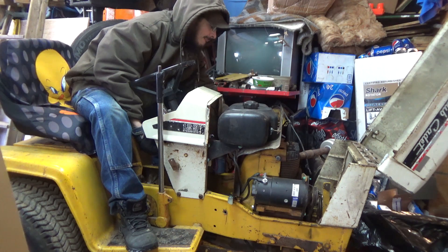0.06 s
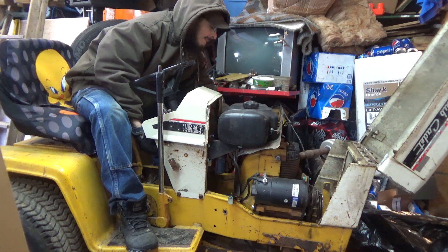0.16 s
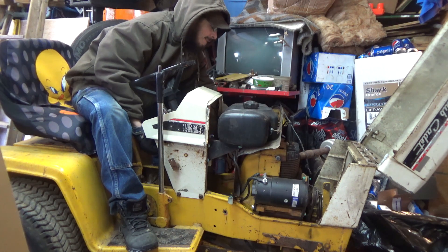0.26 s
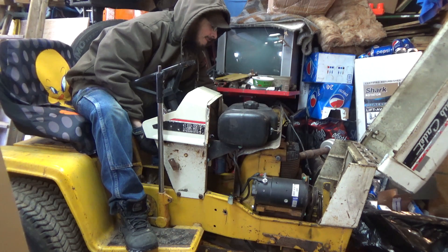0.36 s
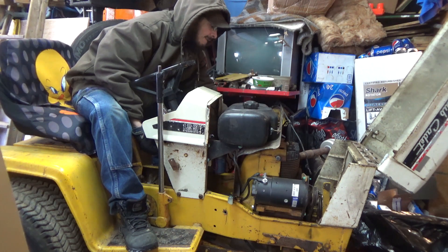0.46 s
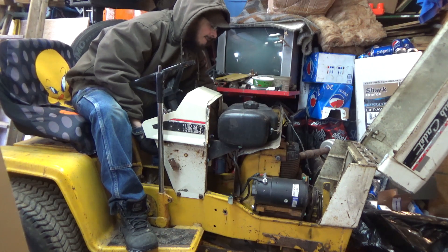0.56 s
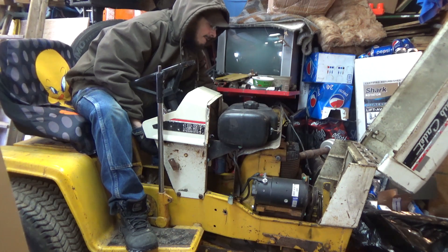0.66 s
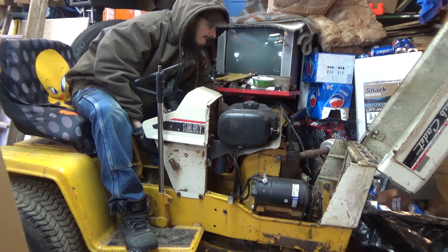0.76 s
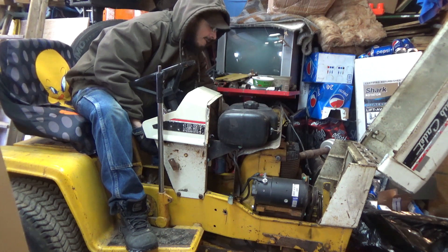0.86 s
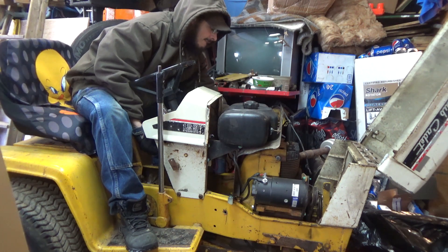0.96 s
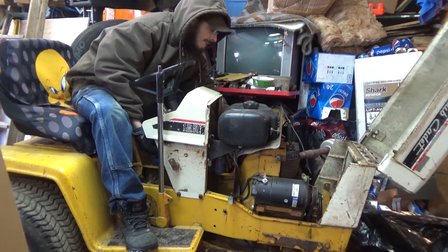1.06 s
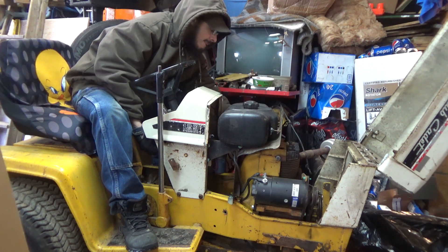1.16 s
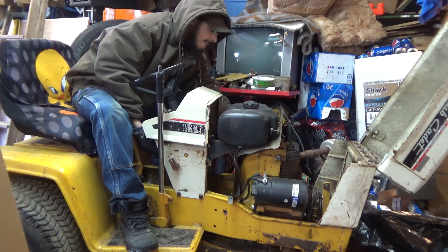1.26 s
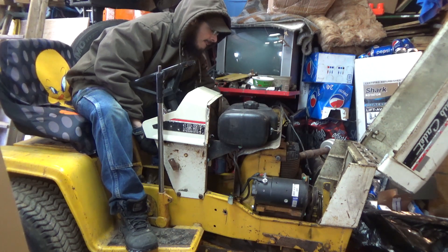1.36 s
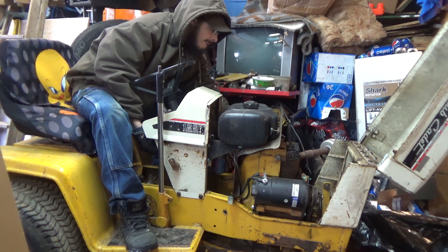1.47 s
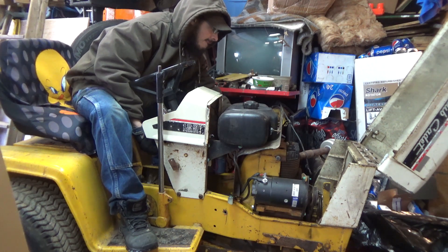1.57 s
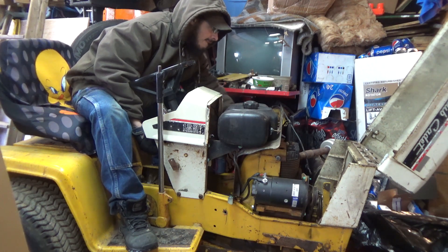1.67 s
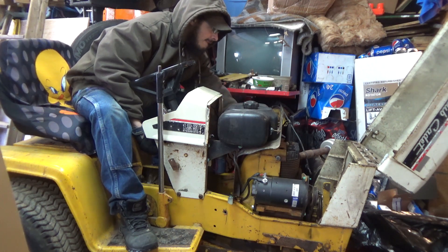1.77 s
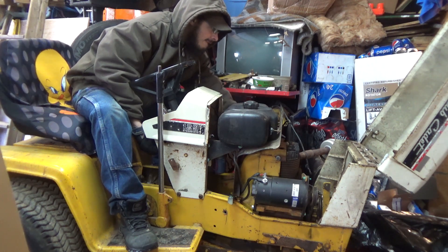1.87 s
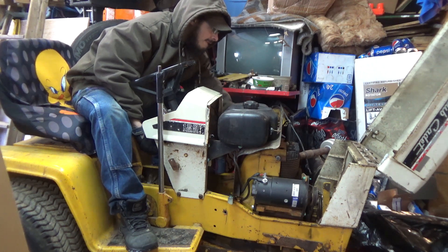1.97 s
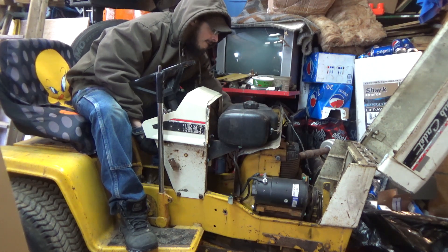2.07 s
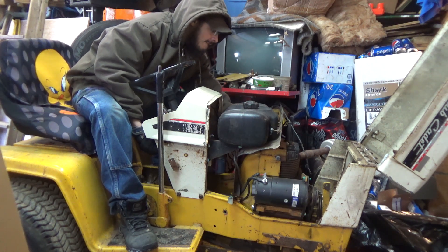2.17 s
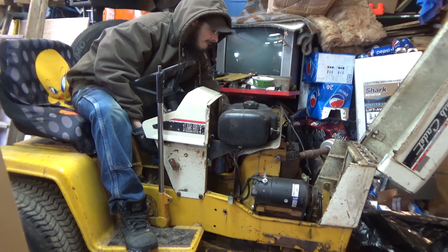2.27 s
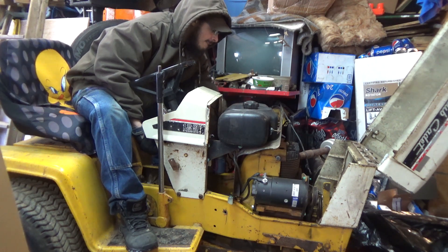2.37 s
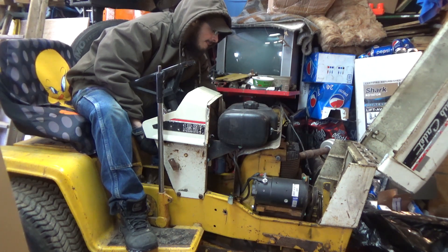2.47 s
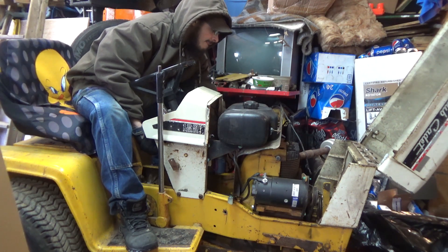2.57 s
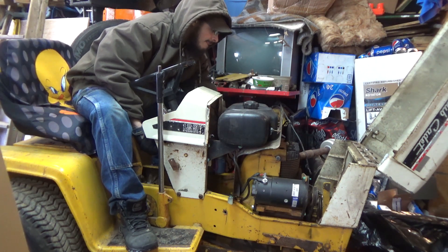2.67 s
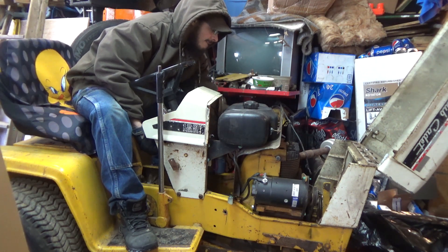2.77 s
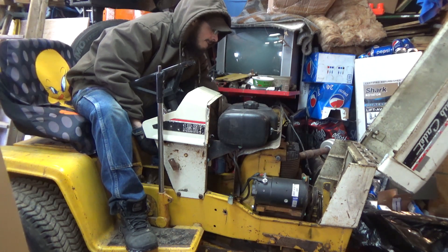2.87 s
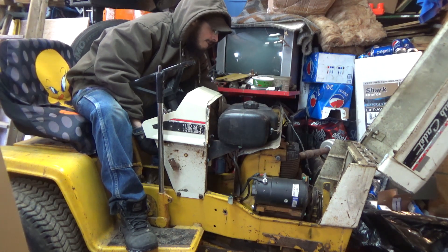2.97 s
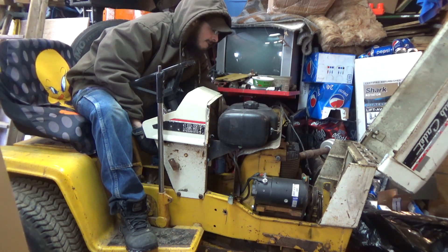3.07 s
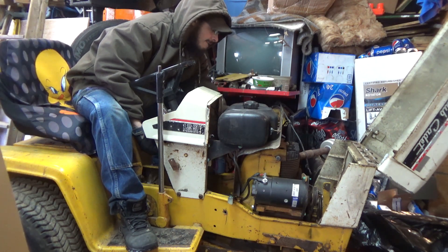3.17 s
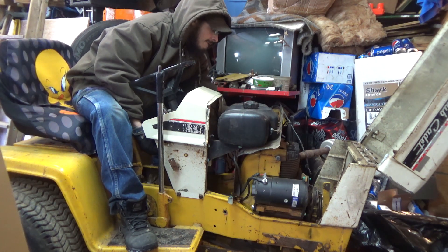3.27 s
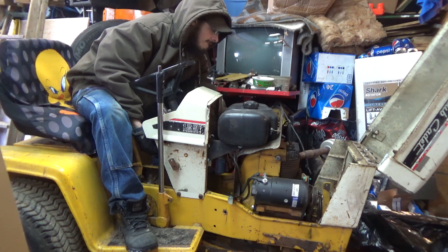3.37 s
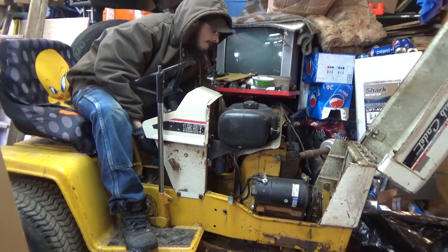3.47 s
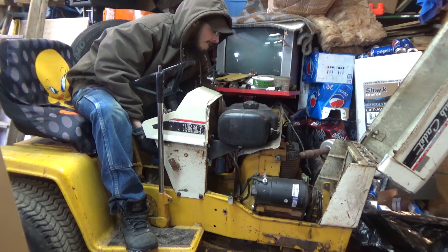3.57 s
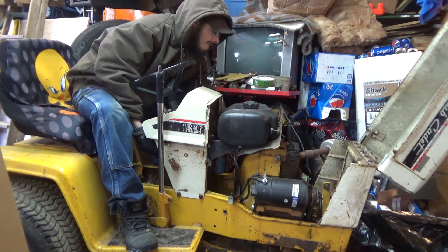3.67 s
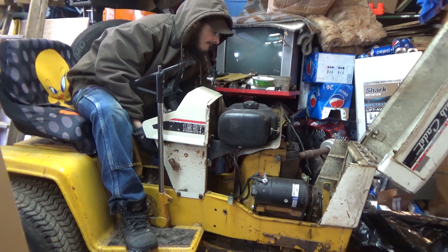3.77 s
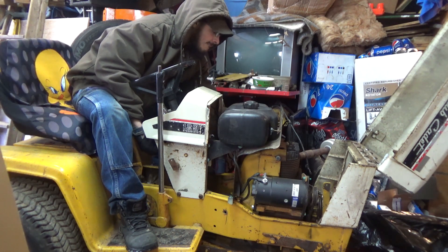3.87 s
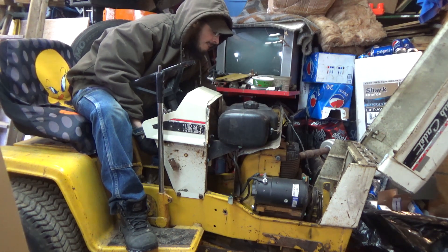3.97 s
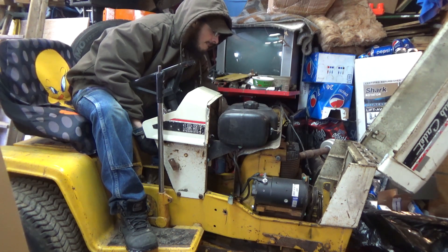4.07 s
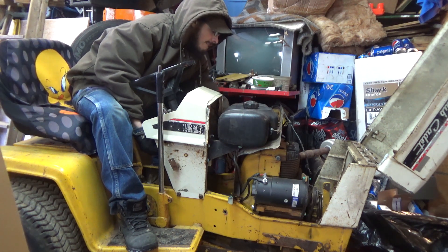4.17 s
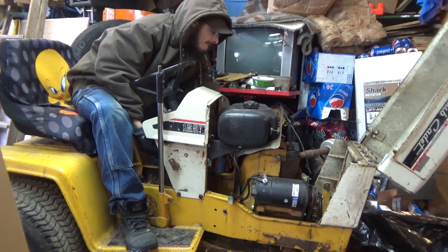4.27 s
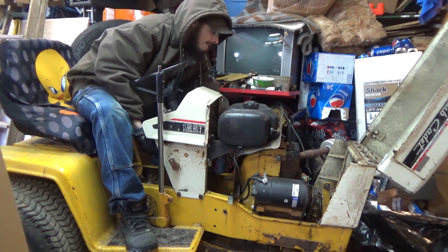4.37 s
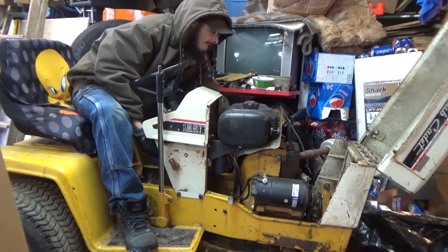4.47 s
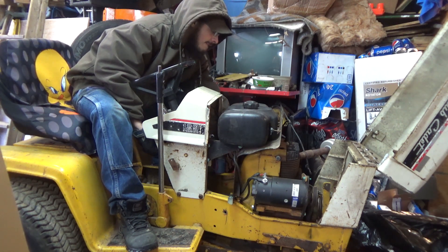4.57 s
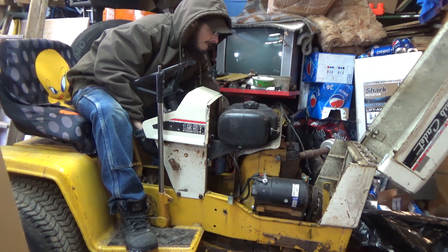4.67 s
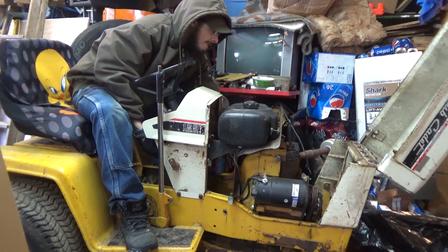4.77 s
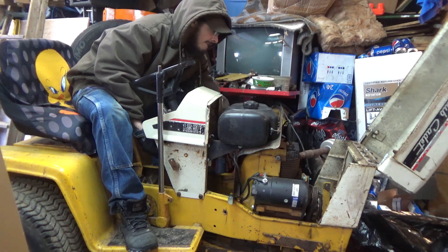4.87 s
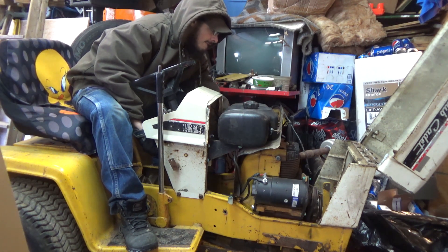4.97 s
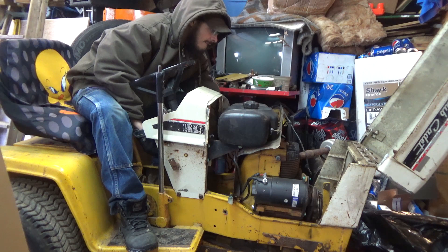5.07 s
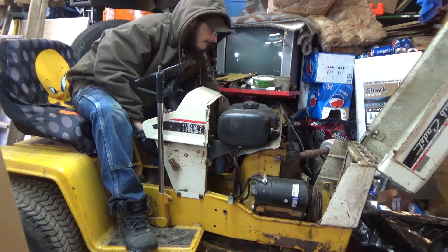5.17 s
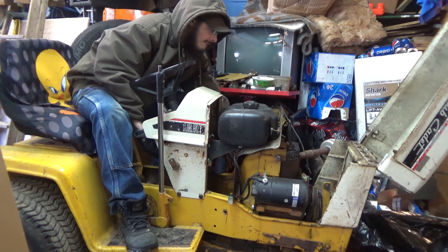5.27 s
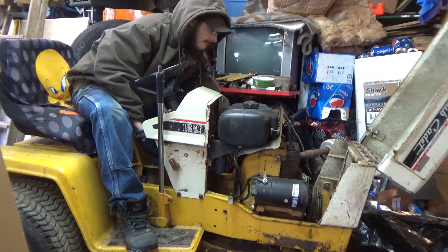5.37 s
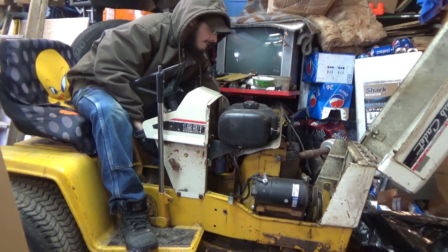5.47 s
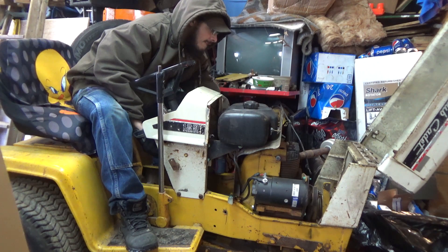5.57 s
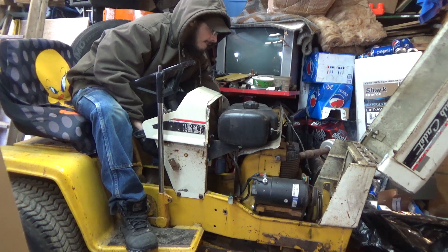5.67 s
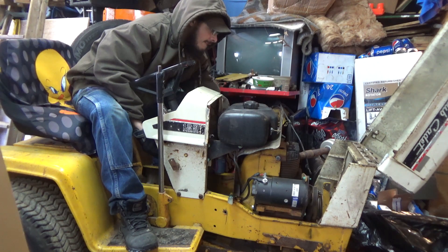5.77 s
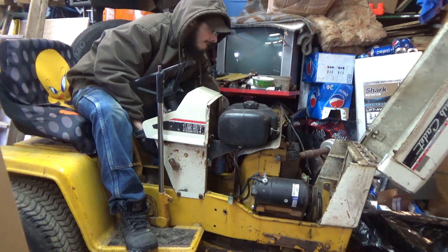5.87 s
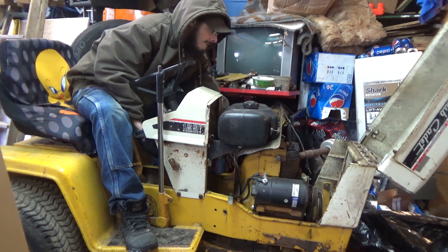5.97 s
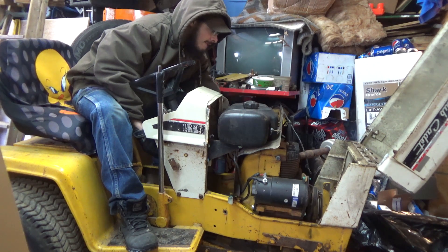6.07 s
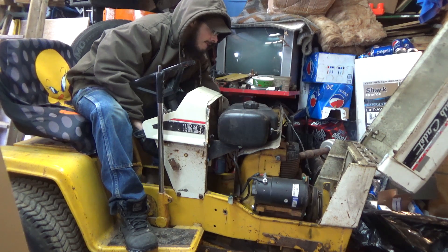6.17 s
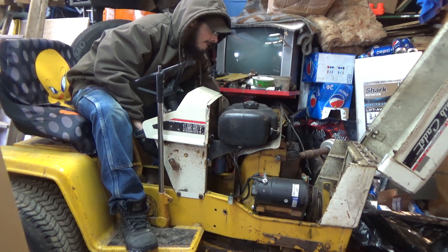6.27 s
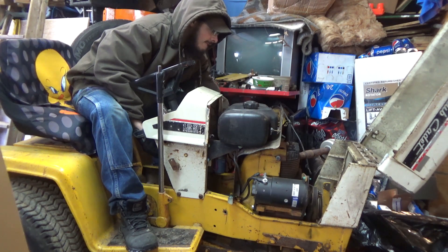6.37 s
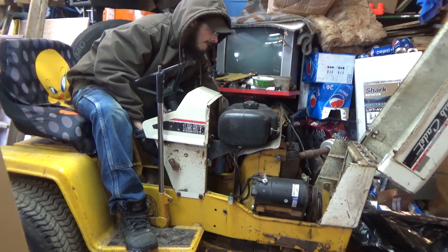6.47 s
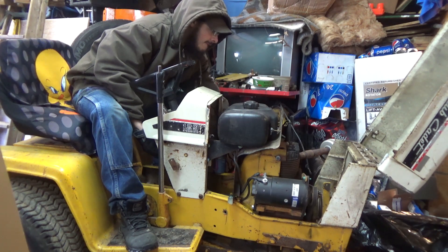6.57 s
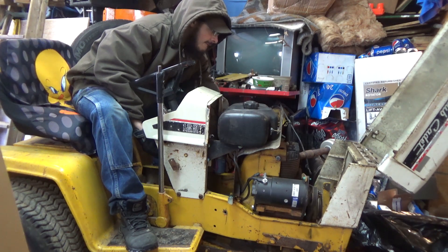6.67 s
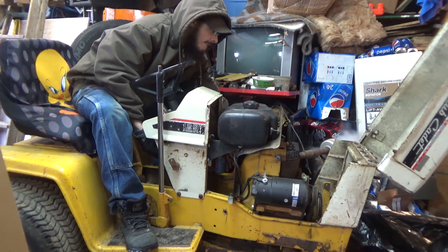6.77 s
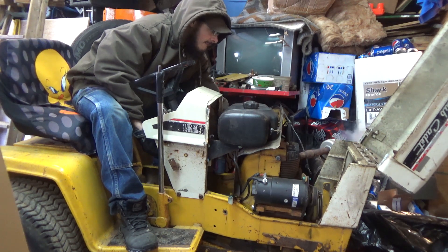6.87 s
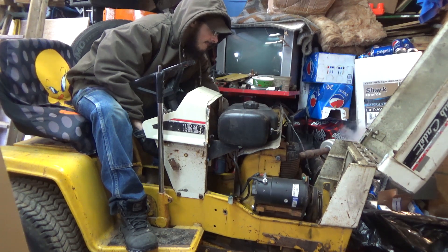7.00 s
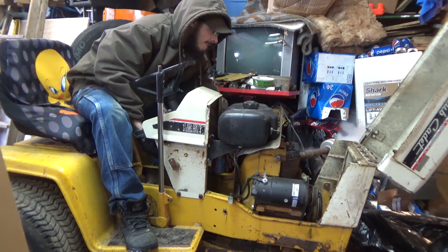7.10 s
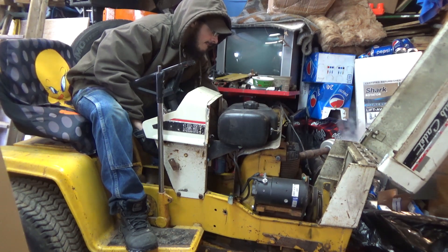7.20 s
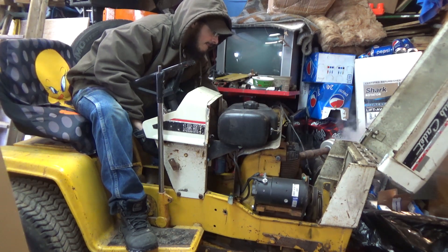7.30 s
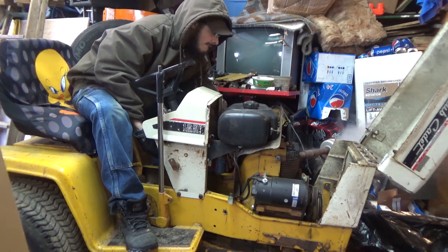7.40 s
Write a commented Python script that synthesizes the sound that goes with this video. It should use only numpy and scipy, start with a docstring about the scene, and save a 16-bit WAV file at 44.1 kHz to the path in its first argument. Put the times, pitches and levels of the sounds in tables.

```python
"""Levers knock and cloth rubs on the seat of a small tractor, close to the microphones in a quiet workshop.
The starter clunks in once and drops out, then grinds the single cylinder over without the engine catching.
Uneven clicks, coloured and swelling in patches, make gear chatter, rumble, hiss and cloth; ringing bursts make
clanks and knocks; decaying tones make the frame's thumps and rising tones the exhaust's puffs.
Faint room air, hum and even ticking lie behind, and short wall echoes surround the close sound."""
import sys
import numpy as np
from scipy import signal
from scipy.fft import rfft, irfft, next_fast_len
from scipy.io import wavfile
from scipy.ndimage import uniform_filter1d

SR = 44100
rng = np.random.default_rng(int(sys.argv[2]) if len(sys.argv) > 2 else 0)


def wav_record(signal):
    """Record a signal, one row per channel, as 16-bit PCM in the file named by sys.argv[1]."""
    frames = np.transpose(np.atleast_2d(signal))
    bounded = np.clip(frames, -1, 1)
    # unit amplitude maps onto the largest positive 16-bit level
    quanta = np.round(bounded * 32767).astype(np.int16)
    wavfile.write(sys.argv[1], SR, quanta)


N = 328104  # samples

# Every level_db is a relative setting: mixing, filters and the final squeeze act on it later.
# Starter turning until the crank spins, one table a burst: start_s, hiss_db, chatter_db, rumble_db
STARTER_BURSTS = [
    [(4.56, -29, -28, -40.5), (4.6, -40, -43, -47), (4.665, -42.5, -40.5, -42.5), (4.72, -48, -45, -40)],
    [(5.12, -52, -59, -53), (5.2, -33, -28, -31), (5.28, -39, -29, -34.5), (5.34, -47, -57, -38.5),
     (5.42, -42, -32, -35.5), (5.51, -46, -44, -38.5), (5.58, -34, -33, -32.5), (5.68, -43, -37.5, -35),
     (5.76, -33, -40, -34.5), (5.815, -41, -41.5, -31)],
]
# Turns of the spinning crank: start_s, hiss_db, chatter_db, rumble_db, swing_depth (factor 0-2)
CRANK_TURNS = [(5.835, -27.5, -25, -27.5, 0.94), (6.107, -26, -23.5, -26, 0.91),
               (6.334, -24.5, -22.5, -25.5, 0.75), (6.538, -23.5, -24, -27.5, 1),
               (6.763, -23.5, -25, -25.5, 1.23), (7.099, -23.5, -24, -26, 1.32),
               (7.403, -27, -21.5, -28, 1.2)]
LAST_TURN_S = 0.19
# Swing within each turn, loud as the load lets go: turn_share (0-1), hiss_db, chatter_db, rumble_db
TURN_SWING = [(.12, 2.6, -0.3, -3.5), (.38, -6.5, -3.5, -2), (.56, -11, -3.5, -0.5), (.68, -6, -9, -2.5),
              (.84, -4, -10, -3.5), (.94, -12, -10, -3.5)]
# Clanks repeated in each of the first turns: turn_share, level_db, brightness_db_per_octave, part
TURN_CLANKS = [(-.028, -4, 0.5, "bright"), (.215, -5.5, -0.4, "chink"), (.36, -7.5, -2.5, "clack"),
               (.62, -9, 1.5, "tock")]
EVEN_TURNS = 3
# Uneven clanks of the engine parts: start_s, level_db, brightness_db_per_octave, part
ENGINE_CLANKS = [(4.522, -4.5, 2.6, "bright"), (4.679, -10.5, -1, "clang"), (4.779, -40, -8, "clang"),
                 (4.915, -35.5, 2.5, "body"), (4.975, -27.5, -4.2, "body"), (5.097, -36, 6, "tock"),
                 (5.137, -14, -1.5, "clack"), (5.16, -7, 1.1, "clack"), (5.218, -4.5, -1.5, "chink"),
                 (5.259, -13.5, -3.5, "clang"), (5.34, -22.5, 7, "tock"), (5.393, -14.5, -1, "bright"),
                 (5.437, -15.5, 0.5, "tock"), (5.529, -16, -1.5, "thud"), (5.608, -12.5, -3.5, "low"),
                 (5.701, -16.5, 1.5, "low"), (5.859, -9.5, 0, "clack"), (6.532, -4.5, .6, "bright"),
                 (6.587, -4.5, -.3, "chink"), (6.62, -7.5, -1.5, "clack"), (6.716, -8.5, .8, "bright"),
                 (6.763, -8.5, 1.7, "clack"), (6.772, -7, 5.5, "chink"), (6.799, -6.5, 10, "bright"),
                 (6.91, -14, -4, "thud"), (6.955, -12, .8, "thud"), (6.998, -8.5, -2.4, "tock"),
                 (7.099, -5, 1.1, "chink"), (7.139, -6, 4, "clack"), (7.256, -14.5, -4, "thud"),
                 (7.283, -11, -2, "low"), (7.319, -11, -2.5, "tock"), (7.403, -4.5, 0.5, "chink")]
# What each part rings with: rise_s, metal_db, then pairs of ring_hz, ring_db
PART_RINGS = {"bright": (.0055, -15, 1180, -10, 5007, -5.5, 6400, -9),
              "chink": (.0012, -14, 1437, -8.5, 3424, -4.5, 2500, -8),
              "clang": (.0025, -10.5, 450, -9, 1460, -8, 2513, -6),
              "clack": (.003, -15, 1110, -8, 2477, -7), "tock": (.004, -14, 870, -8, 1945, -9.5),
              "thud": (.004, -13, 890, -5, 2472, -7), "low": (.0025, -13, 561, -6, 3050, -4),
              "body": (.004, -10, 440, -4, 1500, -7)}
# Ringing of engine and panels: pitch_hz, level_db, t60_s
METAL_MODES = [(418, -14, .3), (454.5, -14, .3), (497.3, -11.5, 0.35), (873, -19, 0.2), (1008, -17, 0.57),
               (1270, -12.5, 0.35), (1477.5, -8.5, 0.19), (1683, -23, 1.5), (2146, -25.5, 1.5),
               (2498, -8, 0.13), (2510, -14, 0.26), (2920, -27, 0.24), (3060, -9, 0.21),
               (3395, -6.5, 0.082), (3780, -13, 0.17), (4800, -13, .15), (5180, -12.5, 0.089),
               (7750, -15, 0.1)]
# Spectrum of gear chatter: pitch_hz, level_db per Hz
GEAR_SPECTRUM = [(710, -29), (1200, -0.5), (1300, -10.5), (1870, -3), (3280, -5.5), (4200, -19),
                 (5460, -39), (9240, -120)]
# Spectrum of frame rumble: pitch_hz, level_db per Hz
RUMBLE_SPECTRUM = [(18, -64), (30, -41), (197, -12), (486, -6.5), (527, .6), (778, -7.5), (897, 2.5),
                   (1100, -10.5), (2500, -11), (4000, -17.5), (5200, -50), (8800, -120)]
# Spectrum of the starter's air hiss: pitch_hz, level_db per Hz
HISS_SPECTRUM = [(2350, -37), (4000, -5), (5040, 1), (6470, -5.5), (7270, -0.5), (11600, -6), (16000, -30)]
# Spectrum of the rattle in each clank: pitch_hz, level_db per Hz
CLANK_SPECTRUM = [(88, -46), (150, -19), (205, -11.5), (254, -19), (457, -8.5), (774, -5), (1790, -2.5),
                  (2140, -5), (3420, -3), (4240, -6.5), (8400, -5.5), (16000, -26)]
# The frame rocks on its mounts: start_s, level_db, pitch_hz
FRAME_THUMPS = [(5.339, -59, 277), (5.383, -49, 278), (5.445, -35, 235), (5.824, -31, 230),
                (5.874, -25.5, 210), (6.101, -28, 220), (6.139, -25.5, 215), (6.234, -29.5, 191),
                (6.355, -24, 206), (6.557, -20, 214), (6.678, -26.5, 261), (7.008, -29.5, 205),
                (7.206, -29.5, 248), (7.317, -27.5, 213)]
# The exhaust valve lets puffs down the pipe: start_s, level_db, length_s
EXHAUST_PUFFS = [(5.554, -47, .11), (5.93, -49.5, 0.07), (6.17, -43, 0.088), (6.39, -41.5, 0.084),
                 (6.593, -39, 0.063), (6.803, -52, 0.075), (6.917, -50.5, 0.084), (7.122, -49, .08),
                 (7.25, -50.5, 0.085)]
# Levers, pedals and seat: start_s, level_db, brightness_db_per_octave, ring_hz, ring_db, rise_s
LEVER_KNOCKS = [(.115, -42, -2.5, 1010, -6, .02), (.22, -28, -.8, 850, 0, .002),
                (.299, -40, -2, 732, -2, .006), (0.344, -20, -4, 800, -1.5, .002),
                (.555, -34.5, -4, 1800, 3, .015), (.826, -42.5, -2, 417, -6, .004),
                (.892, -41, 4, 5000, -3, .0004), (.935, -39, -4, 900, -2, .01),
                (.965, -39, -4, 1750, 5.5, .008), (1.125, -46, 2.5, 3630, 2.5, .0004),
                (1.166, -39, -1.5, 2800, -4, .002), (1.363, -42, -3, 719, -15, .003),
                (1.612, -34, -1, 1260, -3, .008), (1.64, -26.5, -5, 2040, -5, .01),
                (1.689, -31, -1.5, 6300, -4, .006), (1.766, -21, -3.5, 1420, -1.5, .002),
                (1.86, -40, 0, 3400, -5, .006), (1.95, -43, -4, 1720, 3, .02),
                (2.126, -43, 1, 3460, -3, .001), (2.17, -37, .7, 2050, -5, .012),
                (2.3, -42, -2, 1800, -5, .04), (2.77, -48, 1, 7000, -5, .01),
                (2.546, -24, 1, 4470, -8, .003), (3.219, -41.5, -3.5, 988, 0, .002),
                (3.27, -37.5, 1.5, 993, -7, .006), (3.41, -37, 1.2, 945, -5, .008),
                (3.478, -36, .6, 563, -12, .008), (3.676, -26, -.6, 5500, .8, .001),
                (3.856, -42, -4.5, 960, 9, .002), (3.925, -46, 1.5, 2300, -2, .02),
                (4.02, -50, -4, 2310, 1, .02), (4.127, -25, .6, 3100, -3, .006),
                (4.471, -35, 7, 9500, -4, .001)]
# The linkage rings with every knock: pairs of ring_hz, ring_db
LINKAGE_RINGS = (380, -17, 727, -16, 932, -11, 1277, -14)
# Clothes rubbing on the seat: start_s, level_db, brightness_db (treble up, bass down, limited to 9)
CLOTH_RUBS = [(0.0, -61, -2), (0.18, -61, -8), (0.31, -56, -7), (0.58, -56, -2.5), (1.24, -66.5, -6),
              (1.7, -58.5, -7), (1.96, -62.5, -7), (2.4, -60, -5), (2.7, -63, -3), (3.1, -69, -3.5),
              (3.39, -60, -4.5), (3.73, -68, -4), (4.09, -60.5, -9), (4.53, -67.5, -3), (4.67, -68, -18.5),
              (5.13, -61.5, -17)]
# Spectrum of the cloth and of the rattle in each knock: pitch_hz, level_db per Hz
CLOTH_SPECTRUM = [(88, -54), (150, -22), (555, -4), (662, -6.5), (730, -2.5), (1480, -6.5), (1760, -5),
                  (2220, -8), (10600, -7.5), (16000, -23.5)]
# One thin squeak: start_s, end_s, pitch_hz, level_db
THIN_SQUEAK = (2.915, 3, 7080, -70)
# Spectrum of the room air: pitch_hz, level_db per Hz
AIR_SPECTRUM = [(15, -57), (25, -40), (108, -11.5), (263, -9.5), (489, -21), (818, -28), (887, 9),
                (962, -11), (1160, 1), (1560, -13), (3160, -6), (3920, -31), (10700, -13.5), (14800, -17),
                (16000, -27)]
AIR_DB = -66
# A low hum comes and goes: start_s, level_db
LOW_HUM = [(0.0, -74), (0.64, -93), (1.42, -85.5), (3.27, -82), (4.13, -102), (4.29, -85), (4.37, -101),
           (4.55, -76), (4.97, -97), (5.2, -66)]
# Stereo width at the microphones: pitch_hz, side_db relative to mid
SIDE_SPECTRUM = [(60, -37), (110, -36), (200, -34), (380, -18.5), (700, -13.5), (1290, -11.5), (2380, -10),
                 (4400, -10.5), (8120, -11), (15000, -35)]
CLANK_T60 = 0.165  # s, before the treble's faster fall
KNOCK_T60, SLOW_TAIL, TAIL_S_PER_DB = 0.3, 6.5, 0.005  # s, s per s of rise, s per dB
TICKS_PER_S = 29.97
EDGE_HZ = 15900


def engine():
    """Gear chatter, rumble, hiss and clanks; each clank strikes the metal at another spot."""
    levels, even_clanks = turns()
    first_burst = gain_of(curve(STARTER_BURSTS[0]))
    hiss, chatter, rumble = first_burst + gain_of(curve(STARTER_BURSTS[1] + levels))
    gears = patchy(colour(grit(6000.0, 1.4, count=N), GEAR_SPECTRUM), db=3.5)
    frame = patchy(colour(grit(4000.0, 0.91, count=N), RUMBLE_SPECTRUM), db=3.5)
    grind = chatter * gears + rumble * frame
    small_parts = hiss * patchy(colour(grit(12000.0, 2.3, count=N), HISS_SPECTRUM), db=5.0)

    t = np.arange(SR // 2)[:, None] / SR
    hz, db, t60 = np.transpose(METAL_MODES)
    modes = gain_of(db - 60 * t / t60) * np.sin(2 * np.pi * hz * t)
    clanks = ENGINE_CLANKS + even_clanks
    spots = gain_of(2.8 * rng.standard_normal((len(clanks), len(METAL_MODES))))
    for (s, level_db, tilt_db, part), spot in zip(clanks, spots):
        rise, metal_db, *rings = PART_RINGS[part]
        hit = blow(level_db, tilt_db, CLANK_T60, rings, CLANK_SPECTRUM,
                   rise=max(rise, 1e-4), width_hz=120.0, wide_hz=6000.0)
        rung = modes @ spot
        rung = rung / np.linalg.norm(rung)
        add(small_parts, s, hit)
        add(small_parts, s, gain_of(metal_db) * signal.fftconvolve(hit[:SR // 8], rung))

    # the open frame sheds little deep bass
    grind = signal.sosfilt(signal.butter(1, 200.0, "high", fs=SR, output="sos"), grind)
    return gain_of(1.18) * (grind + thin(small_parts))


def turns():
    """Sound swings within each crank turn as the load changes; the even turns repeat their clanks."""
    starts = [row[0] for row in CRANK_TURNS]
    ends = starts[1:] + [starts[-1] + LAST_TURN_S]
    levels, clanks = [], []
    for k, ((s, *db, depth), end) in enumerate(zip(CRANK_TURNS, ends)):
        length = end - s
        for share, *swing in TURN_SWING:
            levels.append((s + share * length, *(db + depth * np.array(swing))))
        if k < EVEN_TURNS:
            clanks += [(s + share * length, *rest) for share, *rest in TURN_CLANKS]
    return levels, clanks


def strokes():
    """Low decaying thumps of the frame, and puffs that rise in pitch as the valve opens."""
    out, t = np.zeros(N), np.arange(SR // 4) / SR
    for s, level_db, hz in FRAME_THUMPS:
        envelope = gain_of(level_db - 60 * t / 0.14) * (1 - np.exp(-t / 0.0025))
        add(out, s, envelope * np.sin(2 * np.pi * hz * t))
    for s, level_db, length in EXHAUST_PUFFS:
        progress = np.arange(0, 1, 1 / (length * SR))
        hz = 55.6 + 52.0 * progress
        tone = np.sin(2 * np.pi * np.cumsum(hz) / SR)
        add(out, s, gain_of(level_db) * np.sin(np.pi * progress) * tone)
    return out


def driver():
    """Knocks of levers and seat ring the linkage over rubbing cloth, with one thin squeak."""
    level_db, bright_db = curve(CLOTH_RUBS)
    bright_db = bright_db.clip(-9, 9)
    rub = patchy(colour(grit(8000.0, 1.5, count=N), CLOTH_SPECTRUM), db=2.0)
    dull = lowpass(rub)
    out = gain_of(level_db) * (dull * gain_of(-bright_db) + (rub - dull) * gain_of(bright_db))

    for s, level_db, tilt_db, hz, ring_db, rise in LEVER_KNOCKS:
        # slow starts and hard knocks die slowly
        t60 = KNOCK_T60 + SLOW_TAIL * rise + TAIL_S_PER_DB * level_db
        knock = blow(level_db, tilt_db, t60, (hz, ring_db, *LINKAGE_RINGS), CLOTH_SPECTRUM,
                     rise=max(rise, 1e-4), width_hz=80.0, wide_hz=2000.0)
        add(out, s, knock)

    start, end, hz, level_db = THIN_SQUEAK
    count = round((end - start) * SR)
    squeak = evened(ring(rng.standard_normal(count), hz, 90.0))
    add(out, start, gain_of(level_db) * squeak * signal.windows.tukey(count, 0.2))
    return out


def blow(level_db, tilt_db, t60, rings, body, rise, width_hz, wide_hz):
    """A rattling burst dies away, treble first; a few rings stand out, broader above wide_hz."""
    t = np.arange(SR // 5) / SR
    # every blow finds other small parts
    parts = rng.standard_normal(400) * gain_of(-60 * t[:400] / 0.014)
    rattle = signal.oaconvolve(grit(15000.0, 1.37, count=len(t)), parts)[:len(t)]
    rattle = evened(colour(rattle, body, tilt_db))
    for hz, ring_db in np.reshape(rings, (-1, 2)):
        width = width_hz * (1 + (hz / wide_hz) ** 2)
        rattle = rattle + gain_of(ring_db) * evened(ring(rng.standard_normal(len(t)), hz, width))
    dull = lowpass(rattle)
    fall_db = -60 * t / np.clip(t60, 0.02, 1)
    sound = dull * gain_of(fall_db) + (rattle - dull) * gain_of(1.29 * fall_db)
    return gain_of(level_db) * sound * (1 - np.exp(-t / rise)) / 3.074


def air():
    """Faint coloured noise for the room, a resonant low hum, and small even ticking near 3 kHz."""
    hiss = gain_of(AIR_DB) * evened(colour(rng.standard_normal(N), AIR_SPECTRUM))
    hum = ring(ring(rng.standard_normal(N), 104.0, 50.0), 104.0, 50.0)
    hum = gain_of(curve(LOW_HUM)[0]) * evened(hum)
    since_tick = (np.arange(N) / SR - 0.0208) % (1 / TICKS_PER_S)
    tick = evened(ring(rng.standard_normal(N), 3070.0, 650.0)) * np.exp(-since_tick / 0.006)
    return hiss + hum + gain_of(-61.5) * tick


def walls(x, t60):
    """Wall echoes from all round: a decaying noise tail of energy 1."""
    t = np.arange(SR // 2) / SR
    tail = signal.lfilter([0.6], [1, -0.4], rng.standard_normal(len(t))) * gain_of(-60 * t / t60)
    return signal.oaconvolve(x, tail / np.linalg.norm(tail))[:N]


def scattered(x):
    """The same sound arrives by ever-changing paths, its spectrum randomly weighted and phased."""
    z = signal.stft(x, nperseg=512)[2]
    field = uniform_filter1d(rng.standard_normal((2, *z.shape)), size=2, axis=1)
    a, b = uniform_filter1d(field, size=4, axis=2)
    return signal.istft(z * (evened(a) + 1j * evened(b)) / 2, nperseg=512)[1][:len(x)]


def patchy(x, db):
    """Loose parts take turns: short resonances swell and fade all over the spectrum."""
    z = signal.stft(x, nperseg=256)[2]
    field = uniform_filter1d(rng.standard_normal(z.shape), size=2, axis=0)
    field = uniform_filter1d(field, size=6, axis=1)
    return evened(signal.istft(z * gain_of(db * evened(field)), nperseg=256)[1][:len(x)])


def grit(per_s, spread_db, count):
    """Random clicks of uneven size, as from many small contacts."""
    size = gain_of(spread_db * np.minimum(rng.exponential(1, count), 4))
    return evened(size * rng.standard_normal(count) * (rng.random(count) < per_s / SR))


def thin(x):
    """Small parts radiate no bass."""
    return signal.sosfilt(signal.butter(3, 240.0, "high", fs=SR, output="sos"), x)


def lowpass(x):
    """One-pole smoothing keeps the dull part of a sound."""
    return signal.lfilter([0.25], [1, -0.75], x)


def ring(x, hz, width_hz):
    """One resonance of gain 1."""
    r = np.exp(-np.pi * width_hz / SR)
    return 2 * signal.lfilter([1 - r], [1, -r * np.exp(2j * np.pi * hz / SR)], x).real


def colour(x, points, tilt_db=0):
    """Filters by a spectrum, tilted around 2 kHz."""
    size = next_fast_len(len(x))
    octave = np.log2(np.fft.rfftfreq(size, 1 / SR) / 2000 + 1e-3)
    hz, db = np.transpose(points)
    gain_db = np.interp(octave, np.log2(hz / 2000), db) + tilt_db * np.maximum(octave, -3)
    return irfft(rfft(x, size) * gain_of(gain_db), size)[:len(x)]


def curve(rows):
    """Table columns at every sample, -120 outside; a table reaching the end holds its last value."""
    s, *columns = np.transpose(rows)
    t = np.arange(N) / SR
    reaches_end = s[-1] * SR > N - 999
    return [np.interp(t, s, c, left=-120, right=c[-1] if reaches_end else -120) for c in columns]


def gain_of(db):
    """Amplitude factor of a level in dB."""
    return 10 ** (np.asarray(db) / 20)


def evened(x):
    """Scales to an RMS of 1."""
    return x / np.sqrt(np.mean(x ** 2) + 1e-20)


def add(mix, s, sound):
    """Lays a sound into the mix from s seconds."""
    part = mix[round(s * SR):][:len(sound)]
    part += sound[:len(part)]


def scene():
    """Close stereo microphones: the sides carry only scattered sound."""
    close = engine() + thin(driver())
    mid = close + gain_of(-13.0) * walls(close, 0.27) + strokes() + air()
    side = gain_of(4.5) * colour(scattered(mid), SIDE_SPECTRUM)
    return np.array([mid + side, mid - side])


def record(dry):
    """Peaks are softly squeezed; then the treble ends at the band limit."""
    squeezed = 0.67 * np.tanh(dry / 0.75)
    band = signal.firwin(511, EDGE_HZ, window=("kaiser", 9), fs=SR)
    return signal.oaconvolve(squeezed, band[None], "same")


dry = scene()
out = record(dry)
wav_record(out)
```